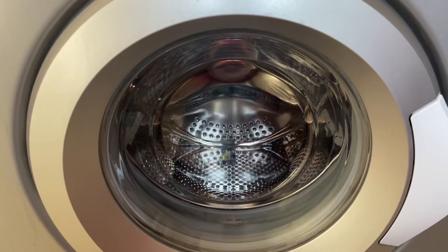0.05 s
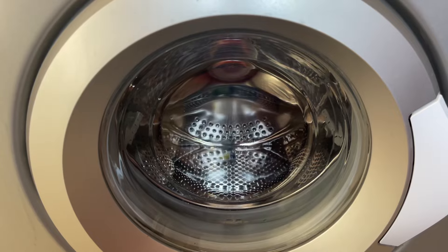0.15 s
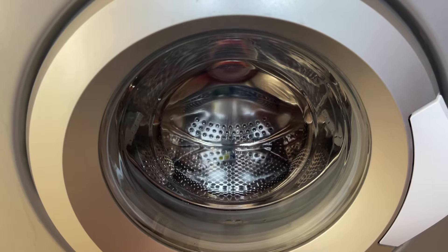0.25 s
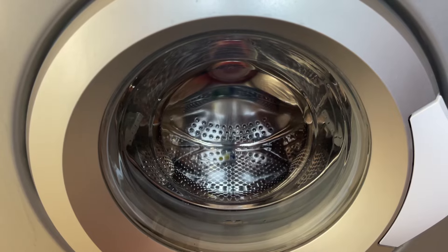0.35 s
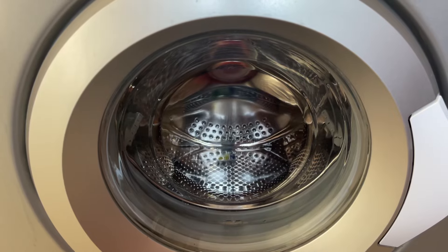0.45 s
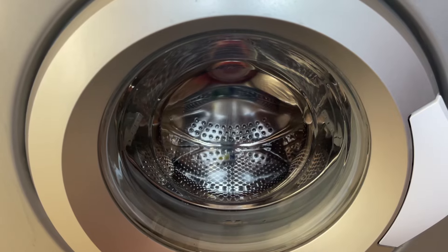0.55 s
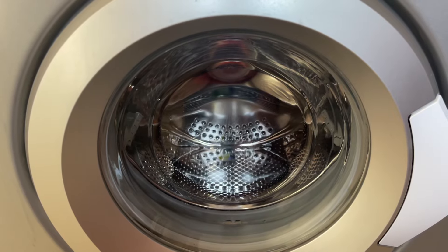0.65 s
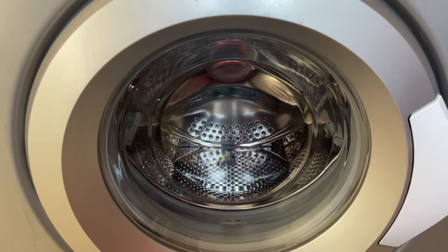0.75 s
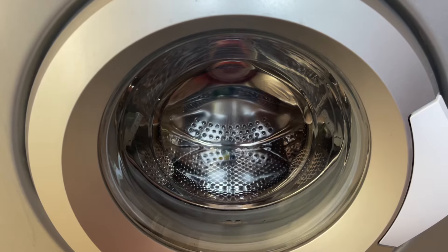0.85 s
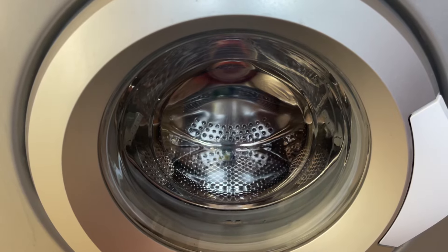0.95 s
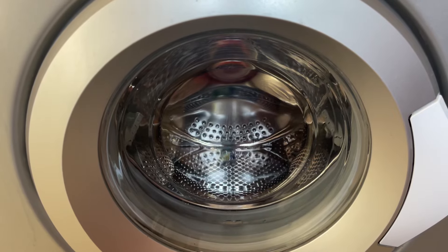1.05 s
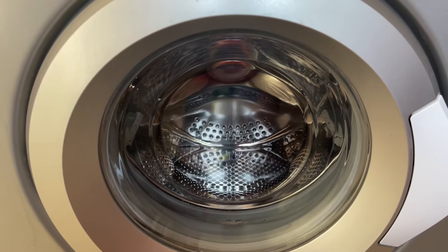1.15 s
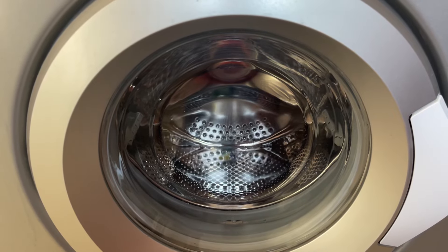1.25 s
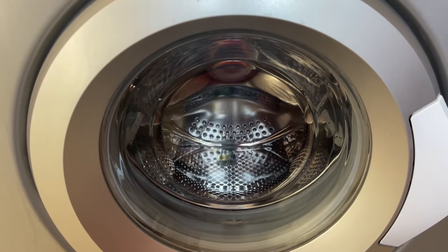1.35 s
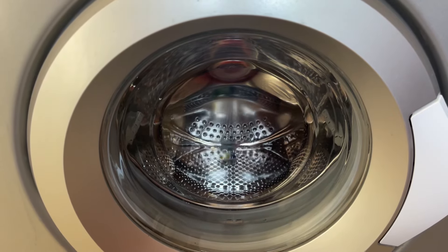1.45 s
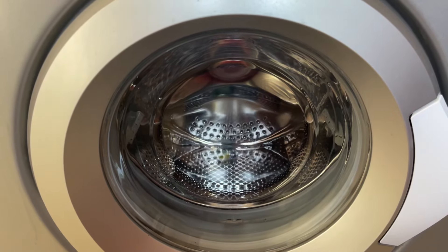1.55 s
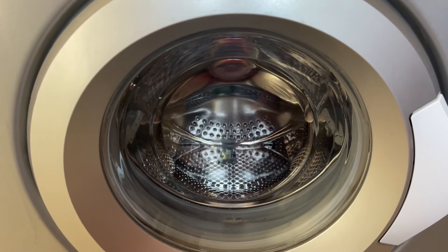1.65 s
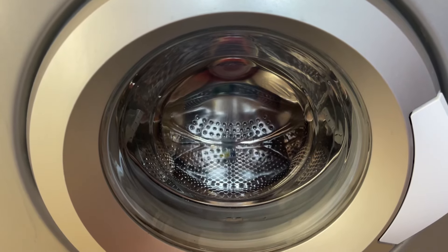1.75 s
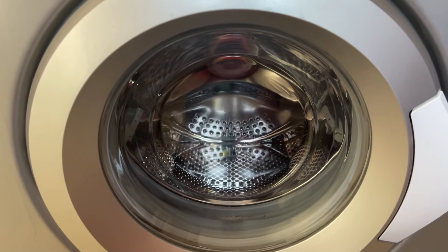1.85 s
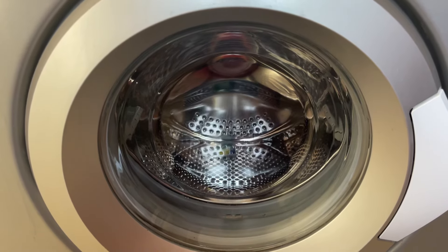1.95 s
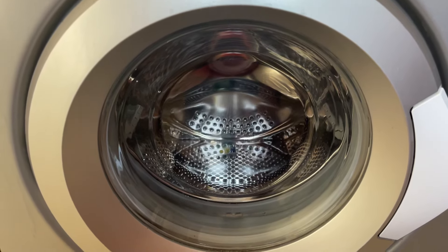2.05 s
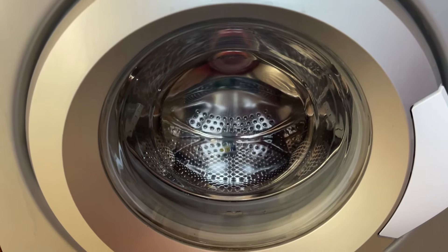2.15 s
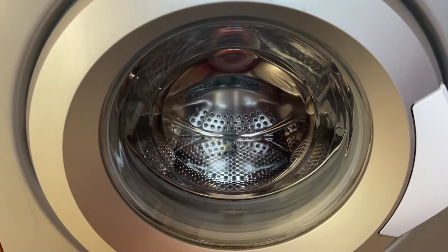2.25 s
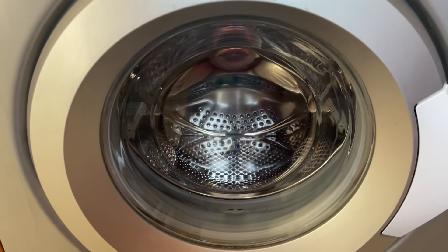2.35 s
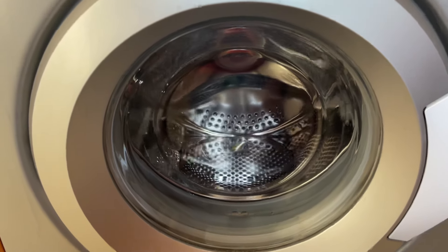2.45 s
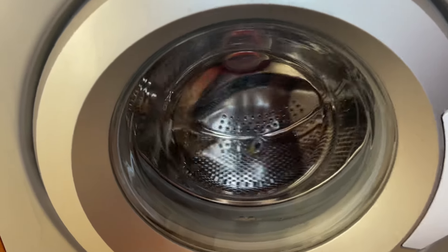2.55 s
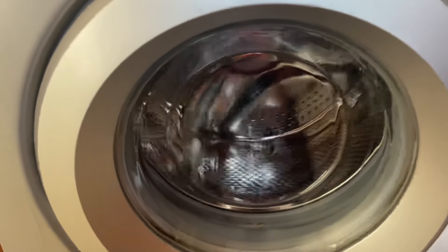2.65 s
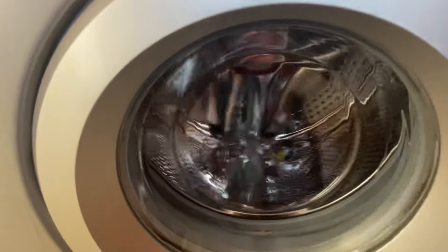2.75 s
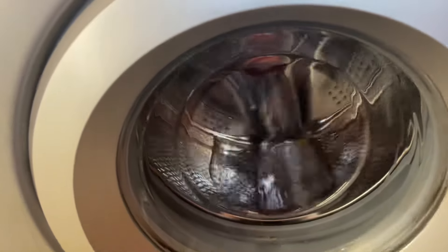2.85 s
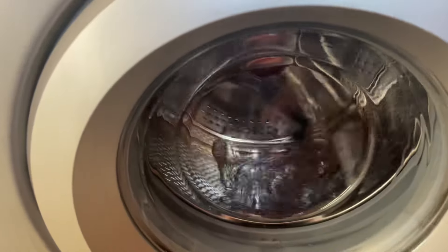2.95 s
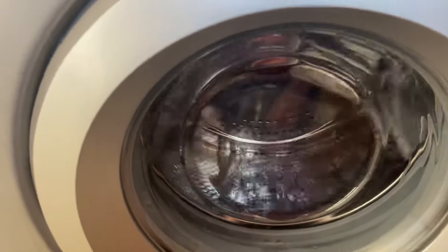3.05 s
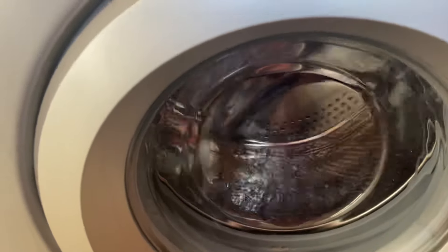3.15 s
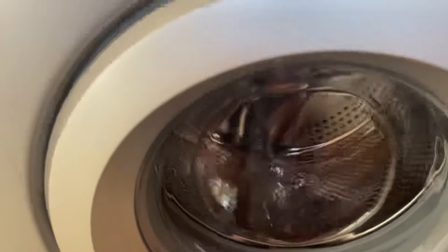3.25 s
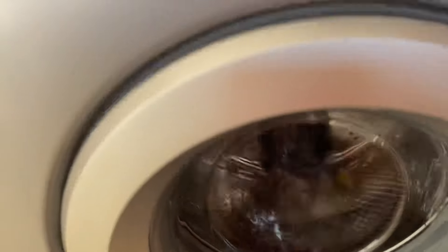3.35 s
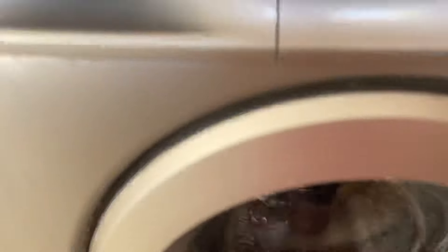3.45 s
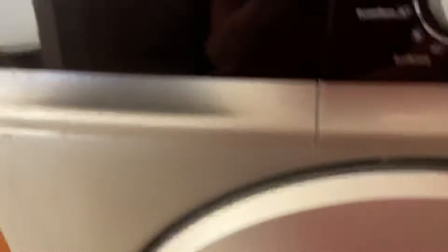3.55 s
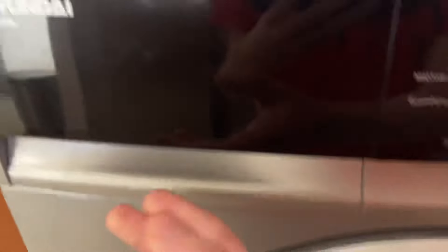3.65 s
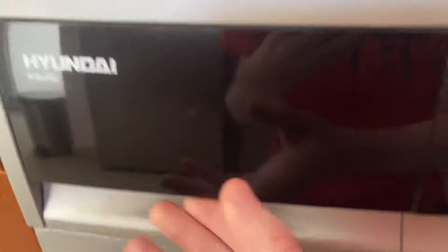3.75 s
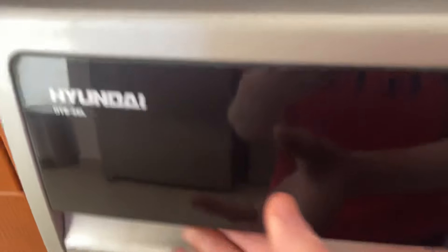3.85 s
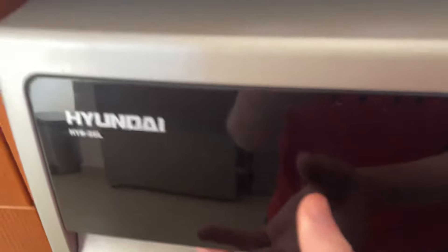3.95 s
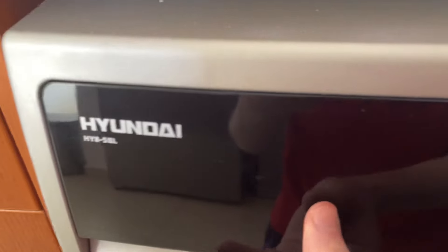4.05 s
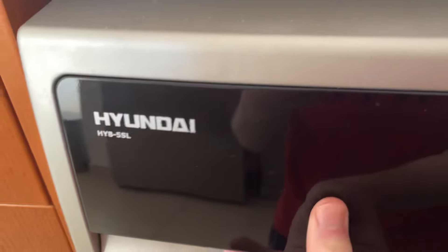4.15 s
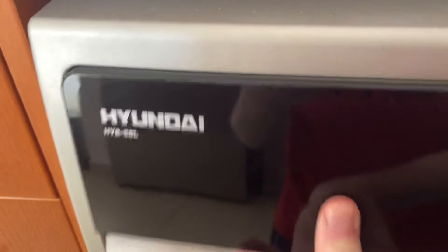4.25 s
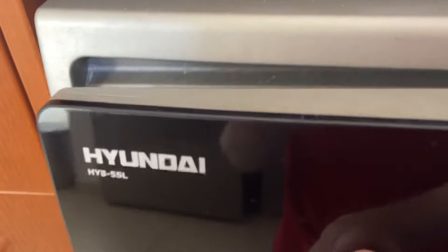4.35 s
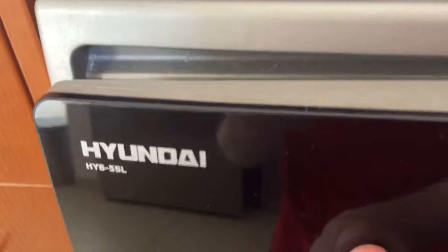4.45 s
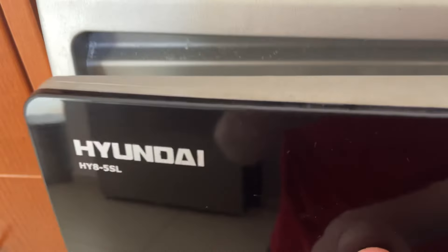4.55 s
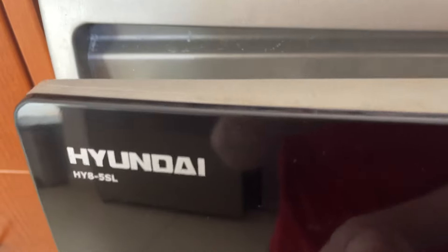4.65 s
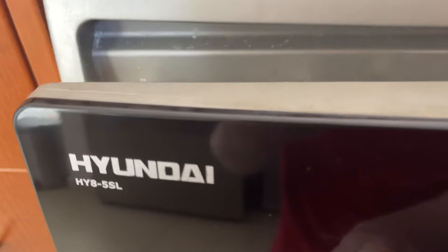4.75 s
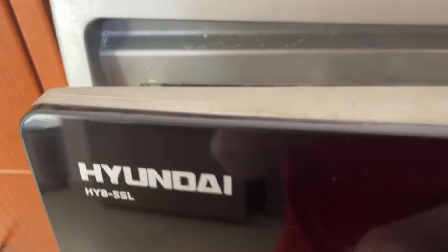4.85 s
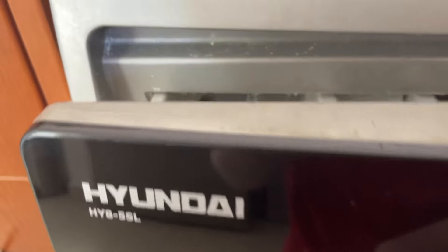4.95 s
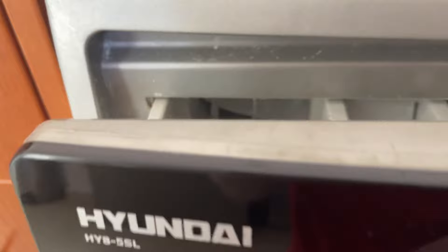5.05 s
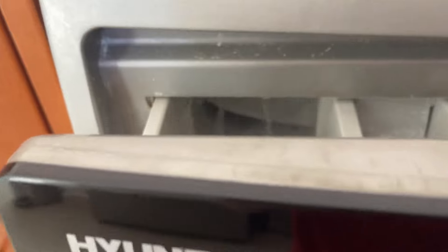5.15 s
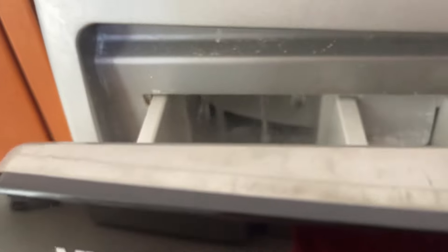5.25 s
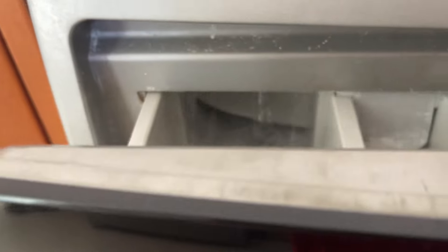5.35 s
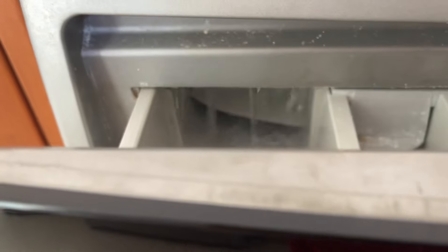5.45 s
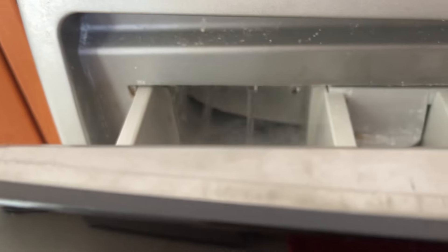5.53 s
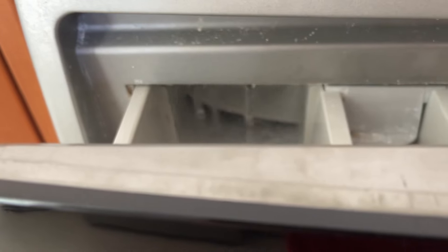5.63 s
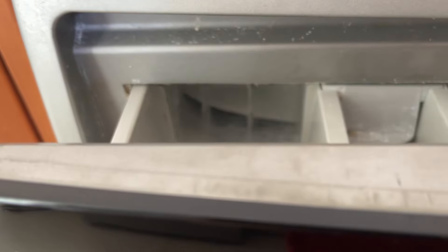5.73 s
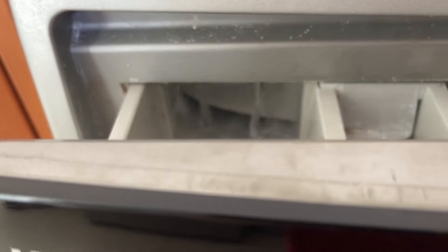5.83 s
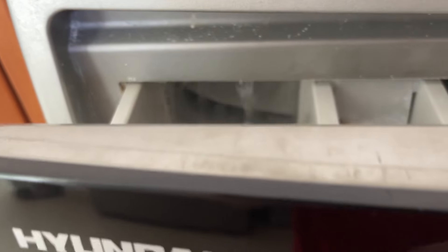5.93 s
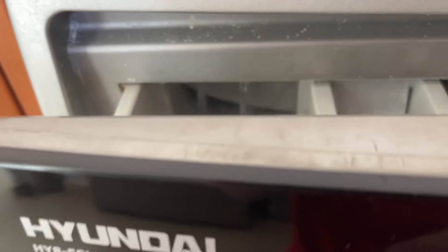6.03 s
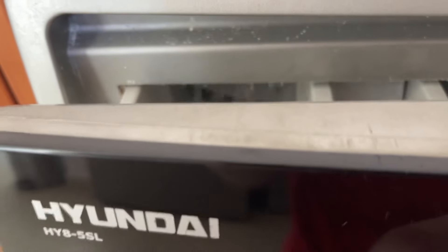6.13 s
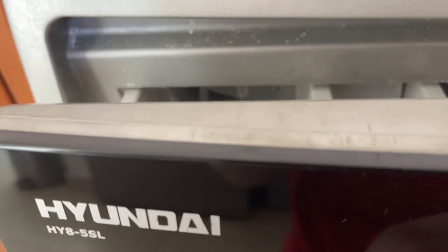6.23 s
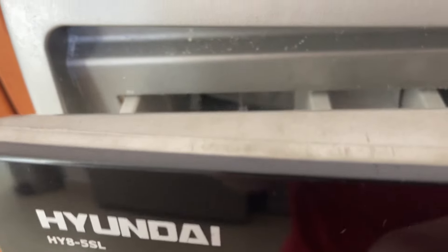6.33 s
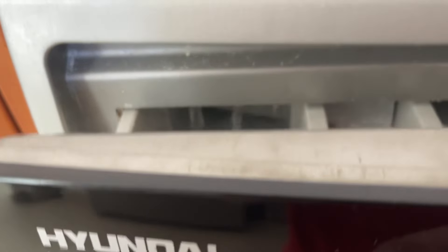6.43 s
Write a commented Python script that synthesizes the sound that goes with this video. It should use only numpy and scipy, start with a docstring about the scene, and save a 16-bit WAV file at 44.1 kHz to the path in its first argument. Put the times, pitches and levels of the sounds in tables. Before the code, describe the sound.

After near silence, a washer starts filling with a buzzing hum and muffled rushing water, until its detergent drawer clacks open onto bright splashing.

```python
"""A quiet room murmurs, then the inlet valve of a washing machine opens with a shudder of the hose.
The coil hums at multiples of twice the mains frequency; random impacts hiss as jets in the detergent drawer
and drum down into the steel drum, coloured by resonances of the part nearest the rising microphone.
A hand pulls the drawer open with a double clack of damped modes and noise bursts; then the spray and the
gurgling tray, made of impacts, noise and bubble tones, are heard directly."""
import sys
import numpy as np
from scipy import signal
from scipy.fft import rfft, irfft
from scipy.io import wavfile
from scipy.ndimage import uniform_filter1d, map_coordinates

SR = 44100
rng = np.random.default_rng(int(sys.argv[2]) if len(sys.argv) > 2 else 0)


def generate_wav(signal):
    """Clip the signal to [-1, 1] and save it as 16-bit WAV at the path in sys.argv[1]."""
    frames = np.transpose(np.atleast_2d(signal))
    scaled = np.clip(frames, -1, 1) * 32767
    pcm = np.round(scaled).astype(np.int16)
    wavfile.write(sys.argv[1], SR, pcm)


N = 286209
T, HZ = np.arange(N) / SR, np.fft.rfftfreq(N, 1 / SR)
VALVE_S, JETS_S, PULL_S = 1.59, 1.775, 4.3  # valve opens, jets gain force, drawer opens


def amp(db):
    """Logarithmic level: decibels become a gain."""
    return 10 ** (np.asarray(db) / 20)


def read(points, hz=HZ):
    """Spectral envelope: a table joined by straight lines on a log-frequency axis."""
    f, value = np.transpose(points)
    return np.interp(np.log(hz + 1), np.log(f + 1), value)


def over_time(points):
    """Time envelope: a table joined by straight lines."""
    return np.interp(T, *np.transpose(points))


def ramp(start, length):
    """Linear onset from 0 to 1."""
    return np.clip((T - start) / length, 0, 1)


def swell(start, rise, t60):
    """Exponential decay after a linear rise."""
    return ramp(start, rise) * amp(-60 * np.maximum(T - start - rise, 0) / t60)


def colour(x, db, band=(0, SR)):
    """Linear filtering: shapes x by a dB curve and brings the given band to rms 1."""
    z = rfft(x) * amp(db)
    inside = z[..., (HZ >= band[0]) & (HZ <= band[1])]
    power = np.mean(np.sum(abs(inside) ** 2, -1))
    return irfft(z, N) * N / np.sqrt(2 * power)


def noise():
    """White noise: equal power at every frequency."""
    return rng.standard_normal(N)


def wander(hz):
    """Random modulation: low-passed noise of rms 1, gently limited to the given rate."""
    return colour(noise(), -20 * np.log10(1 + (HZ / hz) ** 2))


# Likeness of the two ports in a diffuse field. Each row: frequency in Hz, likeness (clipped to 0..1).
LIKENESS = [(60, 2.5), (300, 1), (600, 0.73), (1200, 0.5), (2200, 0.44), (3800, 0.7), (5300, 1.5),
            (7000, 1.07), (8500, 1), (15000, 6.5)]


def half_angle(hz=HZ):
    """Coherence: half the angle between the ports whose cosine is their likeness."""
    return np.arccos(np.clip(read(LIKENESS, hz), 0, 1)) / 2


def ports(make, side_db=0):
    """Coherence: mixes two draws into partly alike ports, the left side_db above the right."""
    a, b = rfft(make()), rfft(make())
    angle = half_angle()
    shared, private = a * np.cos(angle), b * np.sin(angle)
    left = (shared + private) * amp(side_db / 2)
    right = (shared - private) * amp(-side_db / 2)
    return irfft(np.array([left, right]), N)


def impacts(per_s, spread_db):
    """Shot noise: random drop impacts, most small and a few large."""
    size = amp(spread_db * np.minimum(rng.exponential(1, N), 4)) * rng.choice([-1, 1], N)
    return size * (rng.random(N) < per_s / SR)


BUBBLE_SPREAD_DB = 1.3


def bubbles(per_s, low_hz, high_hz, cycles, rise, count=36):
    """Bubble resonance: dying tones of many sizes, each rising in pitch as it nears the surface."""
    out = np.zeros(N)
    for hz in np.geomspace(low_hz, high_hz, count):
        t = np.arange(int(5 * cycles / hz * SR)) / SR
        age = t * hz / cycles
        envelope = np.exp(-age) * (1 - np.exp(-2 * t * hz))
        tone = np.sin(2 * np.pi * hz * t * (1 + rise * age)) * envelope
        out += signal.oaconvolve(impacts(per_s / count, BUBBLE_SPREAD_DB), tone * hz)[:N]
    return out / out.std()


def strike(times, db, ring):
    """Impulse response: convolves every blow with the first second of a ring."""
    blows = np.zeros(N)
    np.add.at(blows, np.round(np.asarray(times) * SR).astype(int), amp(db))
    return signal.oaconvolve(blows[None], np.atleast_2d(ring)[:, :SR], axes=1)[:, :N].squeeze()


def modes(table, attack=0.00054):
    """Modal synthesis: damped sines after one blow, out of step at the ports where these are unlike."""
    t = T[:SR]
    hz, db, t60 = np.transpose(table)[:, :, None]
    phase = 2 * np.pi * (hz * t + rng.random(hz.shape))
    step = half_angle(hz) * rng.choice([-1, 1], hz.shape)
    level = amp(db - 60 * t / t60)
    ring = np.array([np.sum(level * np.sin(phase + side * step), axis=0) for side in (1, -1)])
    return ring * ramp(0, attack)[:SR]


def burst(spectrum, t60, tail_db, tail_t60, attack=0.00021):
    """High modal density: quickly dying noise of a struck part, with its fainter echo in the room."""
    decay = amp(-60 * T / t60) + amp(tail_db - 60 * T / tail_t60)
    return colour(noise(), read(spectrum)) * decay * ramp(0, attack)


def radiate(x, low_hz):
    """Radiation efficiency: thin panels give off little deep bass."""
    return signal.sosfilt(signal.butter(2, low_hz, "high", fs=SR, output="sos"), x)


# The microphone rests before the door, then rises to the drawer.
# Each row: time in seconds, distance travelled in metres.
MIC_PATH = [(2.3, 0.0097), (2.65, 0.12), (3.15, 0.22), (3.55, 0.43), (4.15, 0.653), (4.5, 0.69),
            (6.49, 0.75)]


def travel(t=T):
    """Kinematics: metres that the microphone has moved by time t."""
    return np.interp(t, *np.transpose(MIC_PATH))


# Where each part lies along the path, and how far its ring carries.
DOOR_M, FASCIA_M, DRAWER_M, REACH_M = 0.13, 0.47, 0.69, 0.18
STANDING_WAVE_M = 0.1226  # size of one patch of the sound field
RING_WIDTH_HZ, RING_WIDTH_SHARE = 14, 0.016  # higher resonances are wider
# Resonances of the door, the fascia and the drawer's cavity.
# Each row: frequency in Hz, lift in dB (negative for a dip).
DOOR_RING = [(160, 4.5), (503, 8), (755, 9), (810, 0), (1415, 12), (1570, 6), (2070, 2.5), (2320, -5),
             (2700, 7.5), (3090, 7), (3500, 3), (3660, 10), (3850, 8), (4080, 10), (4220, -9), (4410, 9.5),
             (4630, 6)]
FASCIA_RING = [(497, 15), (1570, 0), (2060, 5), (2260, 5), (3100, 6), (3620, 8), (3745, 10), (4380, 8)]
CAVITY_RING = [(210, 8.5), (252, -9.5), (302, -3), (345, -0.5), (410, -1.5), (580, 5.5), (850, 3.5),
               (1600, 5.5), (2230, -1), (2970, 7.5), (3190, -1), (3630, 5), (3800, 4), (4060, 8.5),
               (4430, 8), (4710, 10.5)]


def cabinet(x, ripple_db, size=4096):
    """Resonance and standing waves: the nearest part colours the water, rippling as the microphone moves."""
    hz, t, z = signal.stft(x, SR, nperseg=size)
    lift = 0
    for ring, at_m in (DOOR_RING, DOOR_M), (FASCIA_RING, FASCIA_M), (CAVITY_RING, DRAWER_M):
        peaks = sum(db / (1 + (2 * (hz - f) / (RING_WIDTH_HZ + RING_WIDTH_SHARE * f)) ** 2) for f, db in ring)
        nearness = np.exp(-((travel(t) - at_m) / REACH_M) ** 2)
        lift = lift + np.outer(peaks, nearness)
    # a random map of level over frequency and place, read along the path
    field = uniform_filter1d(rng.standard_normal((len(hz), 12)), size=2, axis=0)
    place = np.meshgrid(np.arange(len(hz)), travel(t) / STANDING_WAVE_M, indexing="ij")
    ripple = map_coordinates(field / field.std(), place, order=2, mode="mirror")
    return signal.istft(z * amp(lift + ripple_db * ripple), SR, nperseg=size)[1][:, :N]


JETS_DB, JETS_DB_PER_M = -44.5, 4
MIST_DB, MIST_DB_PER_M = -71, 31.5  # fine treble that leaks round the drawer's edge
# Left minus right with the drawer shut. Each row: frequency in Hz, difference in dB.
SIDEWAYS = [(300, 31), (1000, 2.8), (2000, 4.4), (4000, 6), (6000, 7.2), (8500, 0.5)]
# Spectra of the shut-in jets and of their mist. Each row: frequency in Hz, relative density in dB per Hz.
JETS_SHUT = [(200, -45), (500, -10), (800, -5), (1200, -7.5), (2100, -1), (2700, -6), (3900, -7),
             (4600, -8.5), (5300, -14), (7000, -16.5), (8500, -14), (10800, -16), (12000, -26.5),
             (13000, -72)]
MIST = [(2000, -24), (5000, 4), (7000, -15), (8700, 6), (11000, 1), (12000, -9), (13000, -45)]


def jets_shut():
    """Turbulent shot noise: jets hiss in the shut drawer, weakly until the air is out; mist is heard close up."""
    spatter = cabinet(ports(lambda: impacts(9000, 1.9), read(SIDEWAYS)), ripple_db=3.5)
    hiss = colour(spatter, read(JETS_SHUT), band=(1500, 5000)) * amp(JETS_DB + JETS_DB_PER_M * travel())
    mist_db = MIST_DB + MIST_DB_PER_M * np.minimum(travel(), DRAWER_M)
    mist = colour(ports(lambda: impacts(5100, 4.7)), read(MIST)) * amp(mist_db)
    force = ramp(VALVE_S, 0.011) * (0.45 + 0.62 * ramp(JETS_S, 0.098))
    return (hiss + mist) * force * amp(.5 * wander(21)) * (1 - ramp(PULL_S, 0.62))


DRUM_DB, DRUM_DB_PER_M = -44, 5
# Spectrum of water on the drum. Each row: frequency in Hz, relative density in dB per Hz.
DRUM = [(30, -29), (55, -8), (80, -1.5), (125, -13.5), (165, 2.5), (230, -3), (350, -3.5), (480, -7),
        (700, -12.5), (1000, -10.5), (1500, -31), (3000, -67)]


def drum():
    """Forced vibration: water pours on the steel drum, which booms under it."""
    patter = cabinet(ports(lambda: impacts(2500, 1.67), 3.4), ripple_db=3.0)
    water = colour(patter, read(DRUM), band=(130, 1000)) * amp(DRUM_DB + DRUM_DB_PER_M * travel())
    sheet_hz = 243.5 + 3.0 * wander(5.1)  # one panel keeps singing, then fades
    sheet = np.sin(2 * np.pi * np.cumsum(sheet_hz) / SR) * amp(3.9 * wander(2.9))
    fall = water + amp(-46.0) * sheet * (1 - ramp(2.84, 0.73))
    return fall * ramp(1.7, 0.085) * (1 - ramp(PULL_S, 0.65))


SPRAY_DB, SPRAY_DB_PER_M, SPRAY_OPENS_S = -46, 30, 0.37  # level counted from the drawer
DROP_SPREAD_DB, FLURRY_DB = 2.1, 0.9
SPLATS_PER_S, SPLAT_SPREAD_DB, SPLAT_T60_S, SPLAT_DB = 55, 1.8, 0.028, -5
# Spectrum of the open jets. Each row: frequency in Hz, relative density in dB per Hz.
JETS_OPEN = [(300, -45), (800, -2), (1300, -11.5), (2200, -7.5), (2700, -12), (4400, -13), (5300, -16.5),
             (6300, -18), (7400, -16.5), (8300, -10.5), (10700, -10), (12000, -20), (13000, -51),
             (15500, -51)]


def spray():
    """Shot noise and bubble resonance: drops patter in flurries on plastic, splat or trap ringing bubbles."""
    side_db = read([(1000, 0.5), (2500, 4.1), (4500, 4.9), (8000, 0.68)])
    patter = ports(lambda: impacts(6000, DROP_SPREAD_DB), side_db)
    fizz = colour(cabinet(patter, ripple_db=3.0), read(JETS_OPEN), band=(7000, 9500))
    bubbling = ports(lambda: bubbles(130, 815, 6280, cycles=9.8, rise=0.017))
    splat_decay = amp(-60 * T[:SR] / SPLAT_T60_S)
    splashes = signal.oaconvolve(abs(impacts(SPLATS_PER_S, SPLAT_SPREAD_DB)), splat_decay)[:N]
    wet = [(400, -9), (1000, -3), (1800, -1), (3500, -8.5), (6000, -15), (9000, -5), (14000, -50)]
    splats = colour(ports(lambda: splashes * noise(), 2), read(wet))
    water = fizz * amp(FLURRY_DB * wander(33)) + amp(-8.5) * bubbling + amp(SPLAT_DB) * splats
    level_db = SPRAY_DB + SPRAY_DB_PER_M * (travel() - DRAWER_M)
    return water * amp(level_db) * np.sqrt(ramp(PULL_S, SPRAY_OPENS_S))


TRAY_DB, TRAY_DB_PER_M = -34, 23  # counted from the drawer
CHURN_PER_S, CHURN_SURGE_DB, CHURN_SURGE_HZ = 4500, 0.8, 35
GURGLE_TOP_HZ = 427
# Spectrum of the churned water. Each row: frequency in Hz, relative density in dB per Hz.
TRAY = [(30, -28), (70, -41), (130, -31), (210, -5), (290, 2), (400, -5.5), (550, -11.5), (680, -14),
        (850, -9), (1100, -16.5), (1700, -19), (3500, -69)]
# Gain of the deep gurgle. Each row: time in seconds, gain in dB.
GURGLE = [(4.4, -33.5), (4.7, -34), (4.85, -34.5), (5.2, -31.5), (5.4, -34), (5.72, -33.5), (5.84, -31.5),
          (6.25, -31.5), (6.4, -32.5)]


def tray():
    """Bubble resonance: jets churn the open tray into splashing small bubbles over a deep gurgle."""
    def churning():
        return bubbles(CHURN_PER_S, 170.3, 1700, cycles=4.53, rise=0.023) + 0.85 * noise()
    churn = ports(churning, 0.79)
    low = [(25, -43), (65, 0.0), (90, -5), (130, -5.0), (200, -1.5), (400, -42)]
    slosh = colour(ports(noise), read(low))
    water = colour(cabinet(churn, ripple_db=1.0), read(TRAY), band=(130, 1000))
    deep = irfft(rfft(water) / (1 + (HZ / GURGLE_TOP_HZ) ** 8), N)
    surge_db = CHURN_SURGE_DB * wander(CHURN_SURGE_HZ)
    splashing = (water - deep) * amp(TRAY_DB + TRAY_DB_PER_M * (travel() - DRAWER_M) + surge_db)
    gurgle = deep * amp(over_time(GURGLE))
    return (splashing + gurgle + amp(-48.0) * slosh) * ramp(PULL_S, 0.04)


SLIP_LEAD_S = 0.002  # the catch cracks just before it lands
DRAWER_ATTACK_S = 0.0013
# The drawer is tugged twice, lightly, jerks past its catch in a clack of three blows, the last dull,
# then one of two blows, and settles.
# Each row: time in seconds, then relative levels in dB of the thud, the knock of the catch and the crack.
CLACKS = [(4.25, -17, -42, -45), (4.2623, -11, -13, -31), (4.271, -1, 2.5, -5), (4.2755, -7.5, -16, -9),
          (4.2809, -13, -35, -37), (4.291, 0.5, -17, -3), (4.296, -4.5, -8.5, -3), (4.394, -27, -22, -19)]
# Modes of the drawer and of the stiff plastic catch.
# Each row: frequency in Hz, relative level in dB, decay t60 in seconds.
DRAWER = [(60.2, -6, 0.55), (101.5, -15, 0.31), (165.4, -0.5, 0.324), (207.7, -3.5, 0.29), (263, 3, 0.21),
          (342, 9, 0.21), (410, -15, 0.14), (472, 6, 0.13), (527, 0.5, 0.12), (670, 5.5, 0.093),
          (740, 4.5, 0.11), (975, -12, 0.1), (1100, -18, 0.082), (1460, -5, 0.071), (1760, -9, 0.082),
          (1950, -5.5, 0.076), (2370, -5, 0.063), (2930, -31, 0.11), (3230, -4, 0.085), (4230, -8, 0.045)]
CATCH = [(466, 5, 0.024), (650, 0, 0.032), (950, 2, 0.025), (1180, -1.5, 0.044), (1360, 3.5, 0.027)]


def drawer():
    """Stick-slip and modal ringing: the catch slips with a crack, lands with a knock and thud; plastic rings."""
    s, thud_db, knock_db, crack_db = np.transpose(CLACKS)
    body = [(30, -36), (60, -29), (170, 6.5), (500, -2.5), (850, -2), (1400, -6), (1900, -4.0),
            (3500, -16.0), (4500, -16), (7000, -59)]
    edge = [(500, -20), (2000, 1.0), (5500, -1), (6500, 6.0), (7600, -4), (9000, 3.5), (11000, 7.5),
            (12200, -3), (13300, -24), (16000, -48)]
    thud = ports(lambda: strike(s, thud_db, burst(body, 0.018, -16, 0.37, attack=0.00073)))
    crack = ports(lambda: strike(s - SLIP_LEAD_S, crack_db, burst(edge, 0.018, -17.5, 0.22, attack=0.0011)))
    ring = strike(s, thud_db, modes(DRAWER, attack=DRAWER_ATTACK_S))
    knock = strike(s, knock_db, modes(CATCH, attack=0.0011))
    clack = amp(-23) * ring + amp(-14.5) * knock + amp(-13.0) * thud + amp(-17.5) * crack
    return radiate(clack, low_hz=55.7)


KNOCK_GAP_S, KNOCK_JITTER, SHUDDER_DB_PER_S = 0.013, 0.241, -85  # each surge sets off a dying train of knocks
SPIT_T60_S = 0.6
# Pressure surges reach the hose.
# Each row: time in seconds, relative shudder level in dB, relative level in dB of the spit of air and water.
SURGES = [(1.591, -3, -70), (1.606, -0.5, -66), (1.675, 0, -49)]
# Modes of the cabinet panels. Each row: frequency in Hz, relative level in dB, decay t60 in seconds.
PANELS = [(61.6, -11, .7), (84.3, -6, 0.22), (102, 3, 0.28), (150, -13, 0.26), (166.6, 3.5, 0.3),
          (249.5, 4, 0.3), (283, -1.5, 0.22), (389, -15, 0.49), (518, -15.5, 0.27)]


def hose(count=6):
    """Water hammer: each surge knocks the hose against the cabinet panels and makes the nozzles spit."""
    start, shudder_db, _ = np.transpose(SURGES)[:, :, None]
    gaps = KNOCK_GAP_S * np.exp(KNOCK_JITTER * rng.standard_normal((len(SURGES), count)))
    age = np.cumsum(gaps, axis=1) - gaps[:, :1]
    s, db = (start + age).ravel(), (shudder_db + SHUDDER_DB_PER_S * age).ravel()
    rattle = [(25, -49), (50, -21), (90, 0), (180, -8), (290, -3), (420, -13), (1300, -25), (3000, -40),
              (9000, -73)]
    panels = strike(s, db, modes(PANELS, attack=0.0035))
    rattling = ports(lambda: strike(s, db, burst(rattle, 0.068, -15.5, 0.35, attack=0.0019)), 8.3)
    shake = amp(-39.5) * panels + amp(-37.0) * rattling
    spit_level = sum(amp(spit_db) * swell(at - .012, 0.012, SPIT_T60_S) for at, _, spit_db in SURGES)
    spit = colour(ports(lambda: impacts(4800, 2.4), 3.7), read(JETS_SHUT)) * spit_level
    return radiate(shake, low_hz=60.0) + spit


MAINS_HZ = 50
FLUTTER_DB, OVERTONE_FLUTTER_DB, FLUTTER_HZ = 1.3, 2.0, 35  # the rushing water shakes the valve
# Partials of the buzz. Each row: multiple of twice the mains frequency, relative level in dB.
BUZZ = [(1, 0.5), (2, -23.5), (3, -4.5), (4, -16), (5, -15), (6, -16), (8, -26)]
# Course of the hum. Each row: time in seconds, relative level in dB.
HUM = [(1.62, -45), (1.72, -46), (1.81, -55), (2.05, -46.5), (2.3, -45.5), (2.62, -41), (3.0, -45),
       (3.5, -42), (4.15, -47), (4.9, -48), (6.05, -45.5), (6.3, -53.5), (6.45, -50)]


def solenoid():
    """Magnetic force: the coil buzzes at twice the mains frequency; flow roughens each overtone separately."""
    buzz = 0
    for k, db in BUZZ:
        flutter_db = OVERTONE_FLUTTER_DB * (k > 1) * wander(FLUTTER_HZ)
        phase = 4 * np.pi * MAINS_HZ * k * T + rng.uniform(0, 2 * np.pi)
        buzz = buzz + amp(db + flutter_db) * np.sin(phase)
    level_db = 3.5 + over_time(HUM) + FLUTTER_DB * wander(FLUTTER_HZ)
    return amp(level_db) * buzz * ramp(VALVE_S, 0.02) * amp([[.4], [-.4]])  # slightly louder on the left


# Larger masses of water land in the drum.
# Each row: start in seconds, rise in seconds, decay t60 in seconds, boom in dB, splash in dB.
GUSHES = [(2.86, 0.08, 0.37, -35, -47), (3.24, 0.11, 0.67, -43, -43), (3.39, 0.062, 1, -43.5, -38),
          (3.6, 0.066, 0.95, -64, -45.5), (3.85, 0.026, 0.27, -45, -34.5), (4.001, 0.028, 0.27, -36.5, -46),
          (4.08, 0.021, 0.25, -36, -51)]


def gushes():
    """Cavity excitation: water drops in masses with a soft, hollow boom and an uneven splash on top."""
    hollow = [(35, -28), (80, -6), (120, -6), (175, 7), (240, -3.5), (320, -8), (500, -29), (1000, -27),
              (4000, -80)]
    wet = [(100, -31), (200, -17), (340, -3.5), (470, 7.0), (650, -4.5), (880, 0.5), (1150, -7.5),
           (1500, -16), (4000, -15), (9000, -41), (14000, -80)]
    boom = sum(amp(db) * swell(s, rise, t60) for s, rise, t60, db, _ in GUSHES)
    splash = sum(amp(db) * swell(s, rise, t60) for s, rise, t60, _, db in GUSHES)
    water = ports(lambda: impacts(1800, 0.92), 1.8)
    return colour(water, read(hollow)) * boom + colour(water, read(wet)) * splash * amp(1.9 * wander(30))


TICK_ECHO_DB, TICK_ECHO_T60_S = -25, .13
# Sharp ticks of drops on plastic. Each row: time in seconds, relative level in dB.
TICKS = [(2.158, -24.5), (3.239, -51), (4.0865, -33), (4.613, -35), (5.1157, -32), (5.435, -33),
         (5.528, -25.5), (5.981, -30.5), (6.063, -31.5), (6.1339, -42), (6.153, -34), (6.472, -28)]


def ticks():
    """Impulsive contact: single large drops snap against hard plastic."""
    s, db = np.transpose(TICKS)
    snap = [(1000, -15), (3000, -21), (5500, 2.0), (8000, 9.0), (11000, 22.0), (13500, -11), (15300, -13),
            (17000, -22)]
    return amp(2.5) * ports(
        lambda: strike(s, db, burst(snap, 0.02, TICK_ECHO_DB, TICK_ECHO_T60_S, attack=0.00072)))


PING_T60_S = 0.021
# Short high pings: one in the spit as the valve opens, the others from drops, one of them inside a tick.
# Each row: time in seconds, pitch in Hz, level in dB before decay.
PINGS = [(1.667, 4530, -42), (3.032, 6900, -40), (3.362, 7660, -39), (4.891, 4800, -41), (5.39, 6550, -29),
         (5.529, 3450, -25), (5.635, 4540, -29)]


def pings():
    """Damped oscillation: each ping is one short, high, dying sine."""
    return sum(strike([s], [db], modes([(hz, 0, PING_T60_S)])) for s, hz, db in PINGS)


WHISTLE_WIDTH_HZ, WHISTLE_WAVER_DB, WHISTLE_WAVER_HZ = 30, 2.5, 14
# Whistles of the jets. Each row: start in seconds, length in seconds, pitch in Hz, relative level in dB.
WHISTLES = [(3.315, 0.56, 3740, -50), (3.52, 0.18, 3960, -52), (3.56, 0.5, 2937, -52.5),
            (3.6, 0.22, 3120, -54), (3.6, 0.55, 4460, -56)]


def whistles():
    """Narrow-band noise: fuzzy whistles of the jets come and go as the microphone passes the fascia."""
    out = 0
    for s, length, hz, db in WHISTLES:
        note = colour(ports(noise, 2.8), -20 * np.log10(1 + ((HZ - hz) / WHISTLE_WIDTH_HZ) ** 2))
        arc = np.sin(np.pi * ramp(s, length))
        out = out + amp(db + WHISTLE_WAVER_DB * wander(WHISTLE_WAVER_HZ)) * note * arc
    return out


GLUG_S, GLUG_RISE_S, GLUG_T60_S, GLUG_HZ, GLUG_WIDTH_HZ, GLUG_DB = 2.5, 0.2, 0.46, 790, 20, -44


def glug():
    """Air-cavity resonance: a pocket of air in the pooling water sounds one hollow note."""
    peak_db = -20 * np.log10(1 + ((HZ - GLUG_HZ) / GLUG_WIDTH_HZ) ** 2)
    note = colour(ports(lambda: impacts(2240, 1.6)), peak_db)
    return amp(GLUG_DB) * note * swell(GLUG_S, GLUG_RISE_S, GLUG_T60_S)


PLUNGER_S, PLUNGER_DB = 1.606, -44
# Modes of the valve's housing. Each row: frequency in Hz, relative level in dB, decay t60 in seconds.
HOUSING = [(940, -2, 0.07), (1190, -1, 0.036), (1420, 0, 0.061)]


def plunger():
    """Modal ringing: the valve's plunger meets its seat with one small knock."""
    return strike([PLUNGER_S], [PLUNGER_DB], modes(HOUSING))


# Rumbles of the hand-held microphone.
# Each row: start in seconds, rise in seconds, decay t60 in seconds, level in dB.
RUMBLES = [(3.44, 0.064, 0.3, -35.5), (4.07, 0.055, 0.3, -45)]


def handling():
    """Structure-borne noise: the microphone rumbles in the hand as it is lifted."""
    low = [(25, -38), (45, -13), (65, 4), (90, 7), (130, -4), (250, -35), (1000, -90)]
    rumble = colour(noise(), read(low))
    return rumble * sum(amp(db) * swell(s, rise, t60) for s, rise, t60, db in RUMBLES)


# Spectrum of the room. Each row: frequency in Hz, relative density in dB per Hz.
ROOM = [(20, -20), (45, -10.5), (72, 2), (100, -13.5), (170, -13), (290, -10.5), (450, -21), (1000, -26.5),
        (2000, -36), (4000, -51.5), (11000, -54), (15000, -76)]
# Course of the room's faint upper murmur. Each row: time in seconds, relative level in dB.
MURMUR = [(0.1, -2), (0.4, 2), (0.6, -0.5), (0.85, 3), (1.05, -0.5), (1.25, 1), (1.45, 0)]


def room_tone():
    """Diffuse field: low rumble of the room under a faint murmur that swells softly."""
    air = rfft(ports(noise, 3.7))
    low_share = 1 / (1 + (HZ / 900) ** 4)
    rumble = irfft(air * low_share, N) * amp(1.1 * wander(13))
    murmur = irfft(air * (1 - low_share), N) * amp(over_time(MURMUR))
    return amp(-57.5) * colour(rumble + murmur, read(ROOM))


def scene():
    """Superposition: everything around the machine, in two channels."""
    valve = solenoid() + plunger() + hose()
    shut_water = jets_shut() + whistles() + drum() + gushes() + glug()
    open_water = tray() + spray()
    drops = ticks() + pings()
    return room_tone() + valve + shut_water + open_water + drops + drawer() + handling()


EDGE_HZ = 15900  # upper band limit
# Phase between the microphone ports. Each row: frequency in Hz, lead of the left in radians.
LEAD = [(0, -0.5), (1460, 0.5), (3100, 1.0), (6720, 1.07), (7750, 1.5), (8870, -1.5), (9730, -2),
        (10500, -3.5), (11700, -5.5), (16000, -4.5)]


def record(dry):
    """Phase difference and band limit: the ports are shifted apart, then low-passed."""
    lead = read(LEAD, np.fft.rfftfreq(2 * N, 1 / SR))
    heard = irfft(rfft(dry, 2 * N) * np.exp(.5j * lead * np.array([[1], [-1]])))[:, :N]
    low_pass = signal.firwin(511, EDGE_HZ, window=("kaiser", 9), fs=SR)
    return signal.oaconvolve(heard, low_pass[None], "same")


dry = scene()
out = record(dry)
generate_wav(out)
```